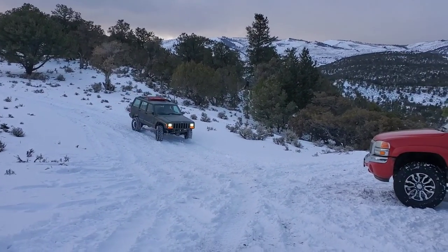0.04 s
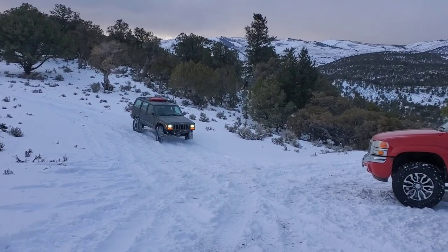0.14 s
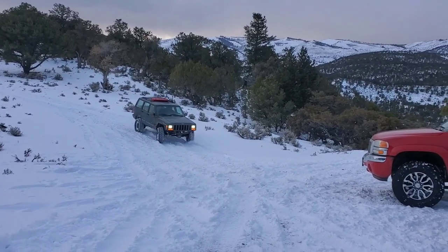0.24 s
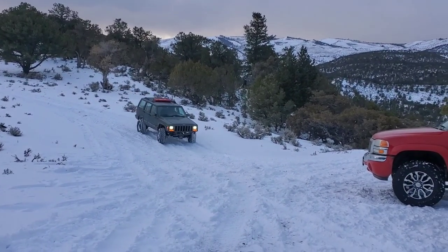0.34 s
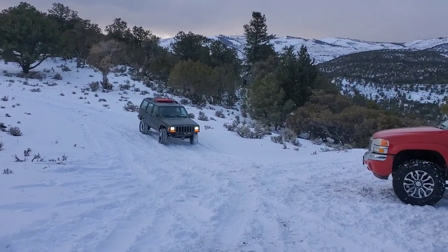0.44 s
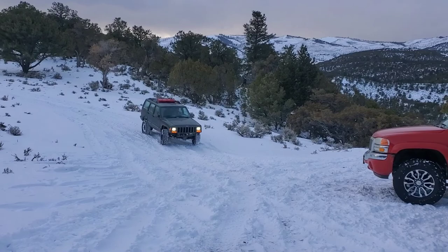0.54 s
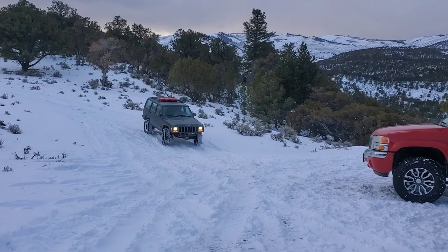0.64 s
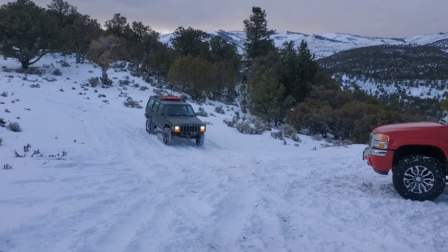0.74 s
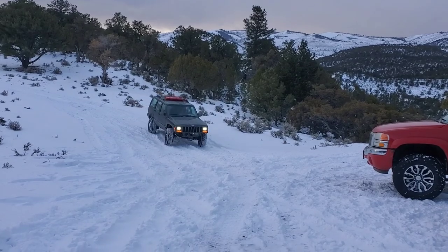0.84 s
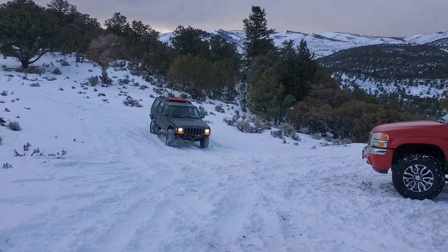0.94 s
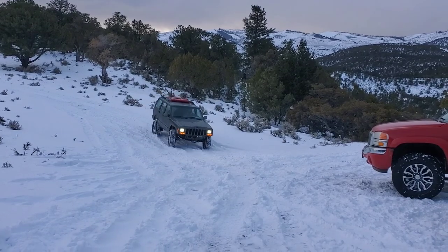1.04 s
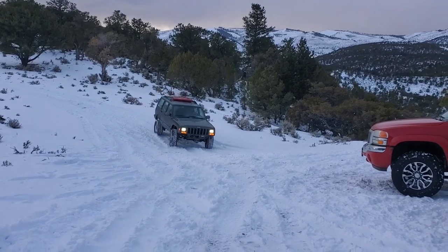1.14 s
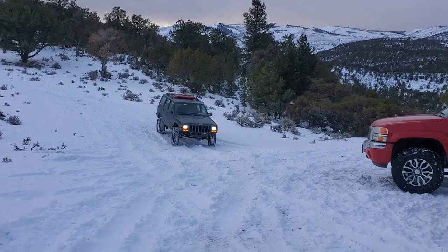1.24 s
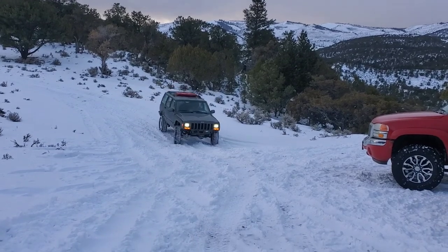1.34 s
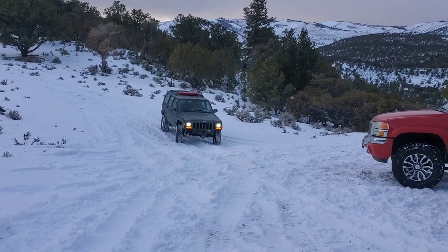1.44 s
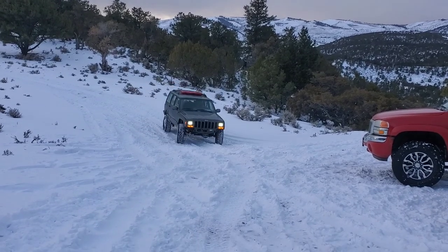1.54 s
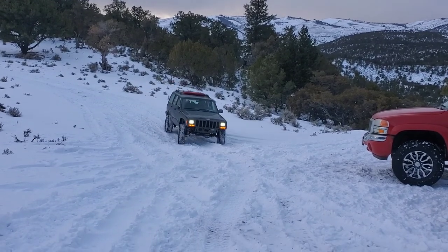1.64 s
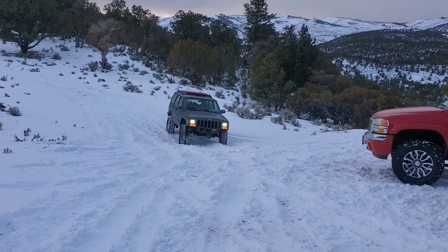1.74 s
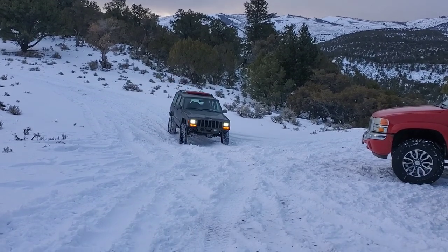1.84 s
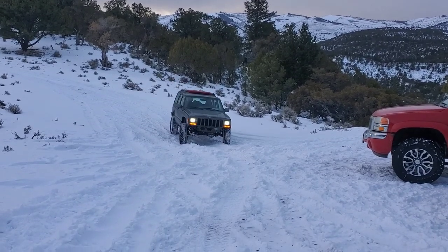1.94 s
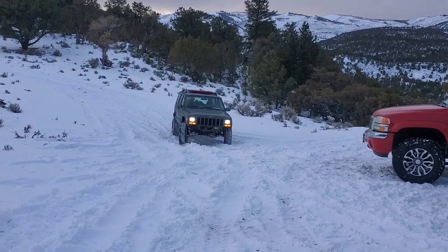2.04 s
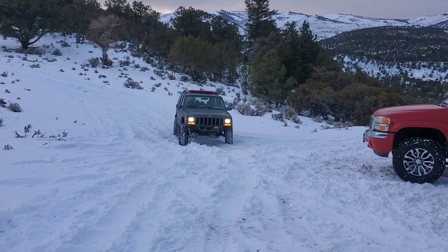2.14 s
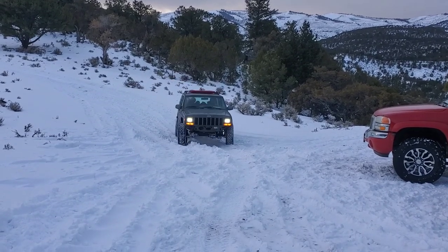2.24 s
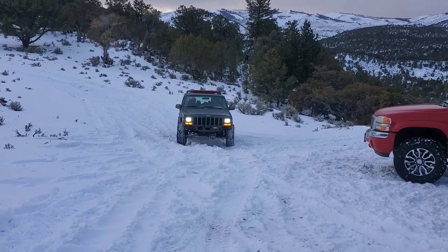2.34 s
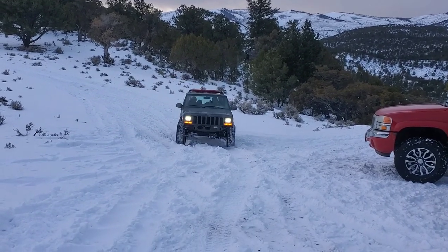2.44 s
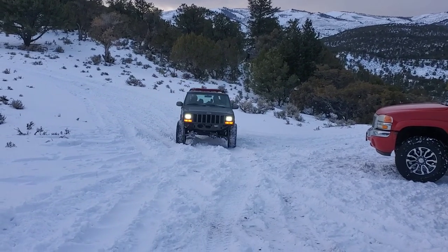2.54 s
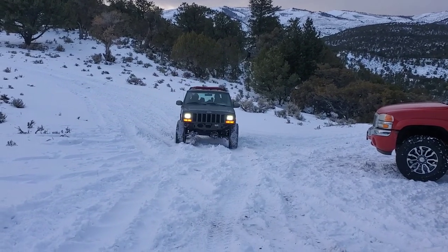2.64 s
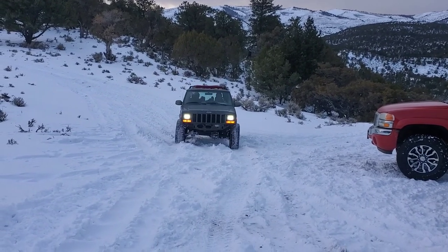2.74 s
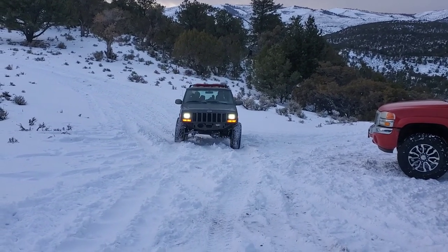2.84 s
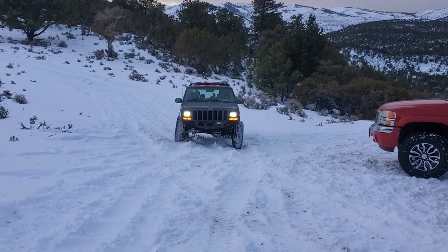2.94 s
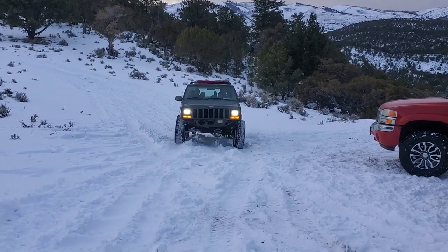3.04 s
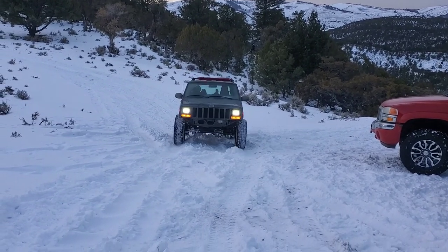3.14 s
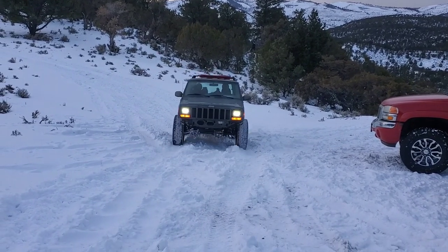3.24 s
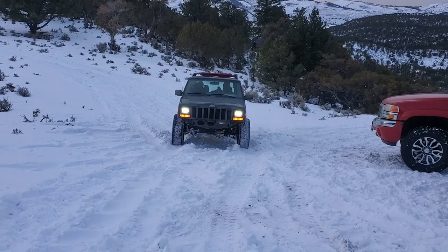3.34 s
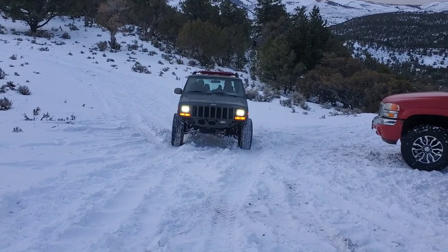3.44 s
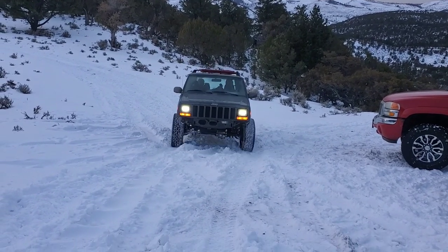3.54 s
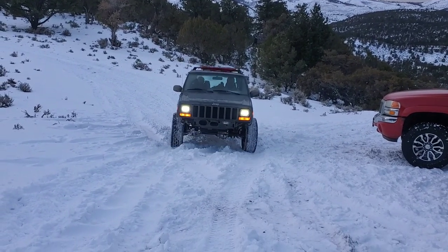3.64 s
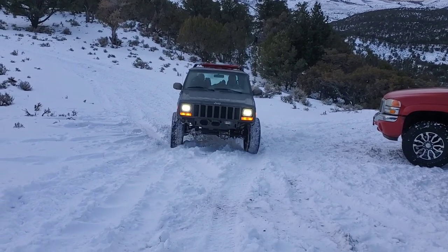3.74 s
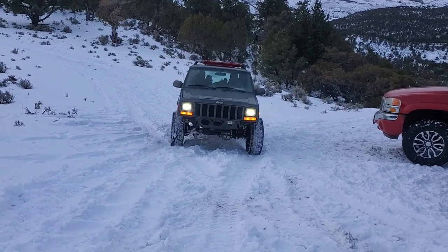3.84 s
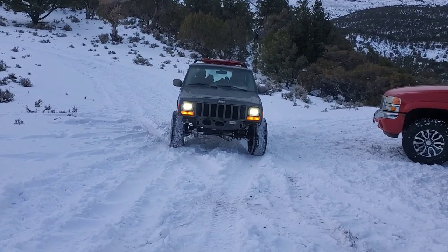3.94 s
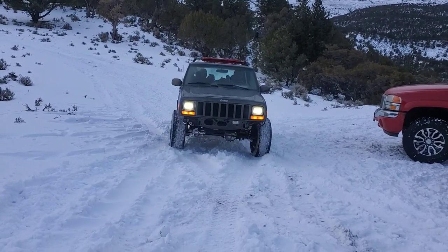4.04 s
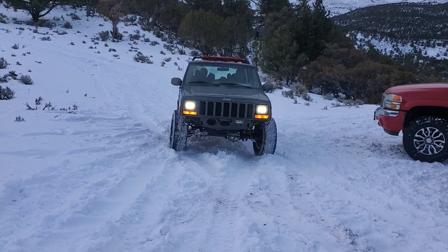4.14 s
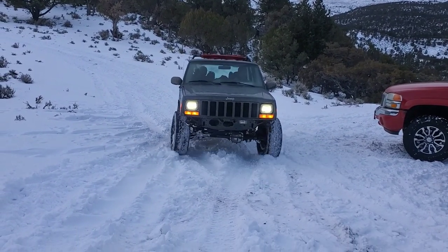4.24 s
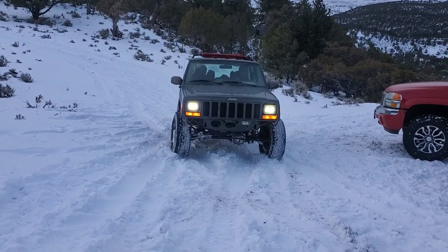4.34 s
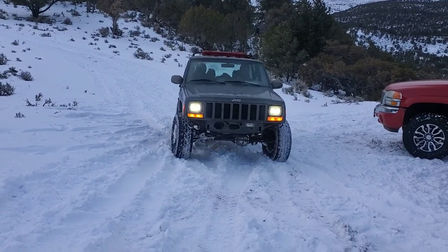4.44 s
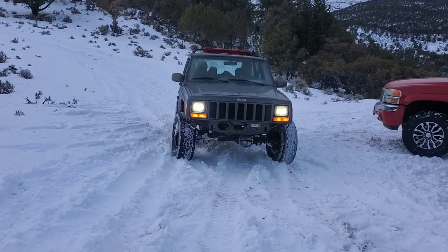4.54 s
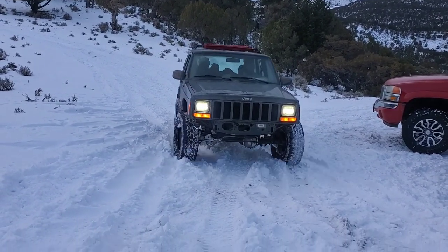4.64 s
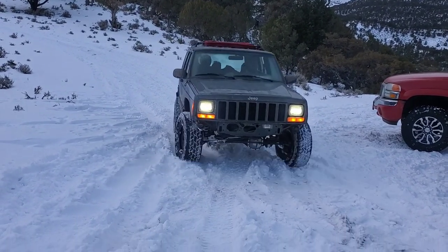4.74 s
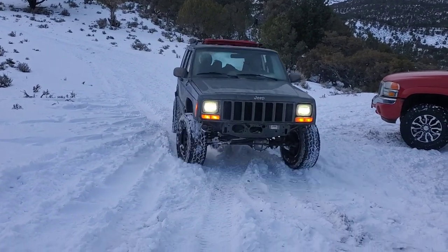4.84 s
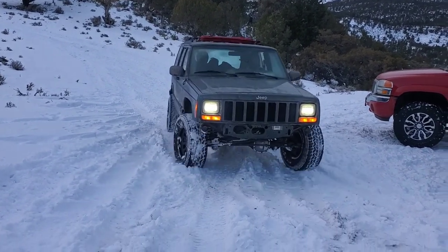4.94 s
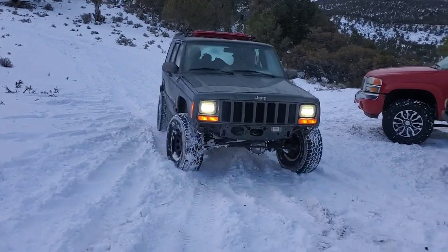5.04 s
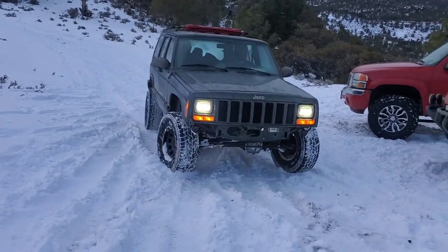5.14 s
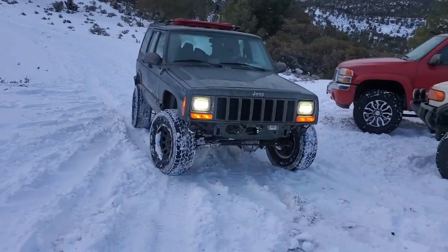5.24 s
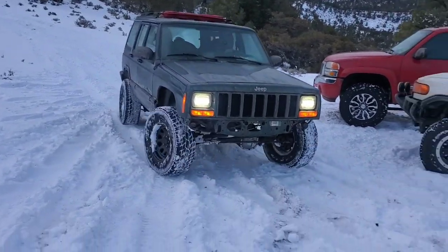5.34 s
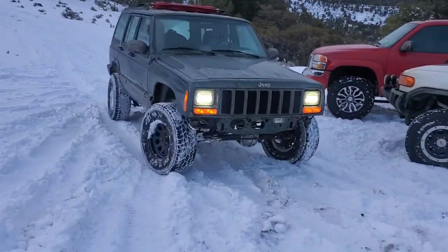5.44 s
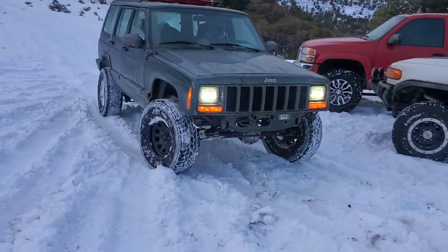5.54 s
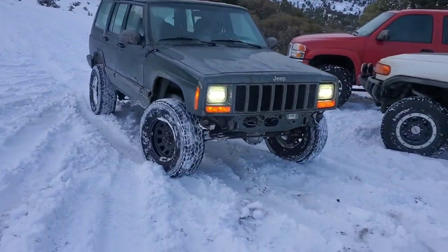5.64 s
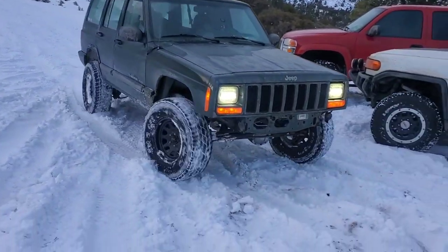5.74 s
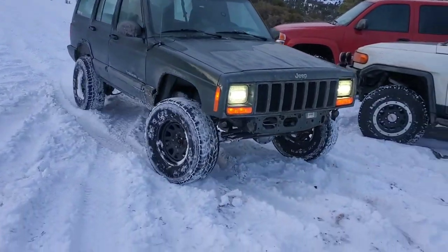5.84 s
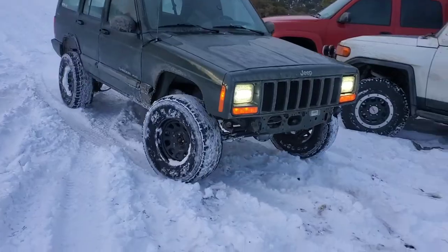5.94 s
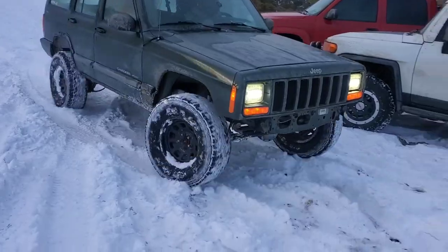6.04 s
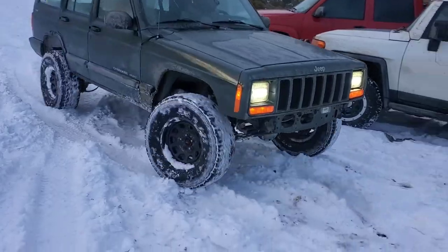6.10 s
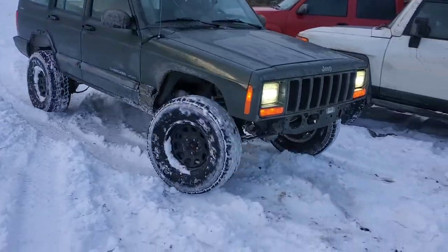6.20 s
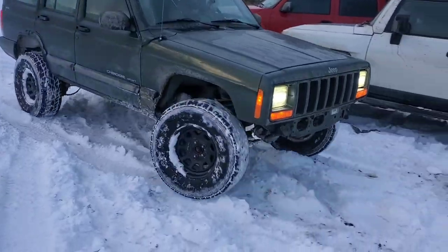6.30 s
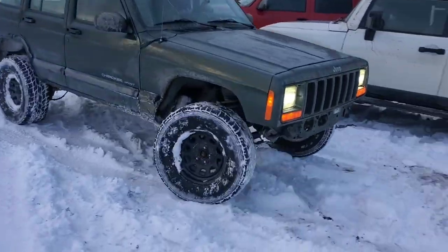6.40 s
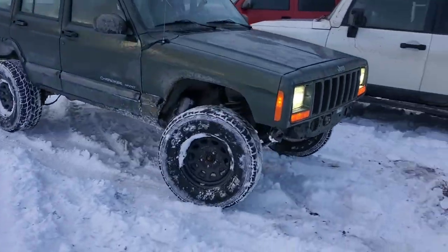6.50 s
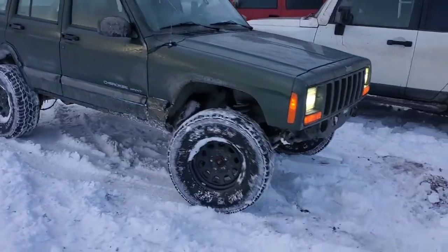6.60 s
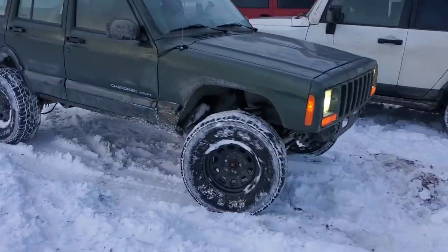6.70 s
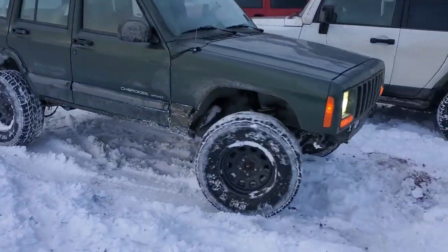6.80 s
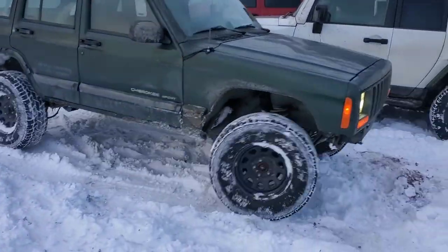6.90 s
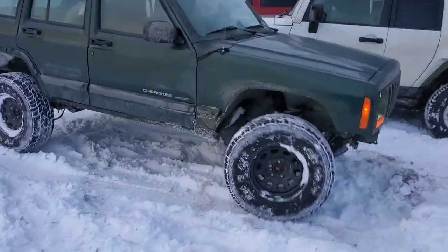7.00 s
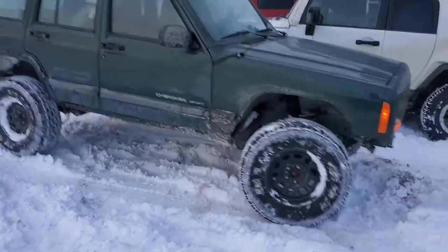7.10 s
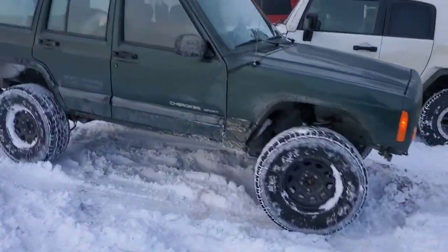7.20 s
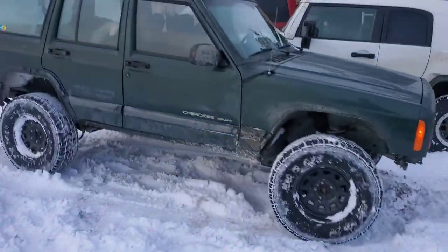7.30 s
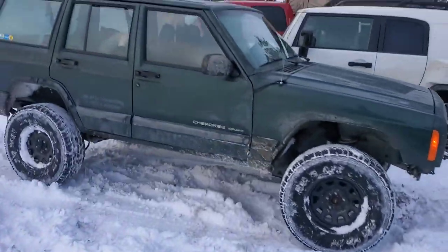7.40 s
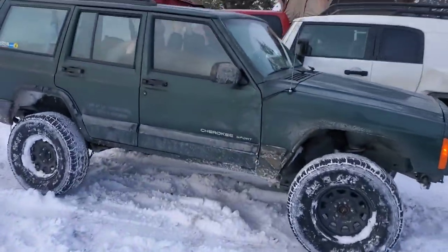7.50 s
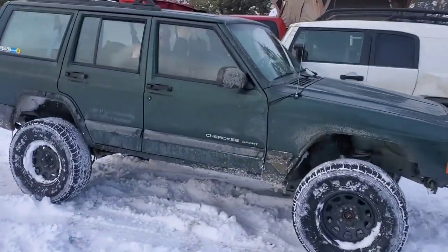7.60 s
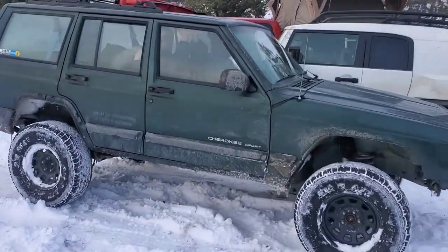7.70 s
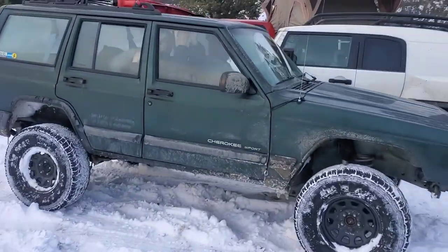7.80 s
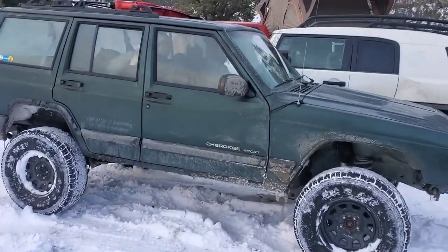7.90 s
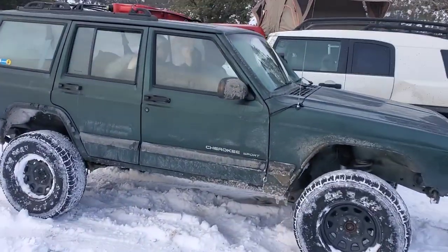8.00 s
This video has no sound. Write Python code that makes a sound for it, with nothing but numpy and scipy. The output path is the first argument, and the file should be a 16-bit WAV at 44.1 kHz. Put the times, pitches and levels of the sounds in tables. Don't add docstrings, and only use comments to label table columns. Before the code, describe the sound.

Low exhaust pulses, fan roar and belt whine approach across crackling snow, dropping to a lumpy idle amid buffeting gusts.

```python
import sys
import numpy as np
from scipy import signal
from scipy.io import wavfile
from scipy.ndimage import uniform_filter1d

SR = 44100
rng = np.random.default_rng(int(sys.argv[2]) if len(sys.argv) > 2 else 0)


def transcribe(signal):
    frames = np.atleast_2d(signal).T
    limited = np.clip(frames, -1, 1)
    pcm = np.round(limited * 32767).astype(np.int16)
    wavfile.write(sys.argv[1], SR, pcm)


def level_to_linear(level):
    exponent = np.asarray(level, float) / 20
    return 10 ** exponent


N = 355446
T = np.arange(N) / SR
CRUISE_HZ = 64


def evened(x):
    return x / np.sqrt(np.mean(x ** 2) + 1e-20)


def read(points, hz):
    f, value = np.transpose(points)
    return np.interp(np.log(hz + 1), np.log(f + 1), value)


def columns(rows):
    s, *rest = np.transpose(rows)
    return [np.interp(T, s, c) for c in rest]


def dips(rows):
    return sum(db * np.exp(-((T - s) / length) ** 2) for s, length, db in rows)


def drift(fastest_hz):
    steps = rng.standard_normal(N // 64 + 2)
    low_pass = signal.butter(2, fastest_hz, fs=SR / 64, output="sos")
    smooth = signal.sosfiltfilt(low_pass, steps)
    return np.interp(np.arange(N) / 64, np.arange(len(steps)), evened(smooth))


def band(x, lo_hz, hi_hz, order=3):
    return signal.sosfiltfilt(signal.butter(order, [lo_hz, hi_hz], "band", fs=SR, output="sos"), x)


def tone(turns, db):
    return np.sqrt(2) * level_to_linear(db) * np.cos(2 * np.pi * turns)


def paths(hz, s):
    # left_ms, right_ms, gain, lengthening_ms_per_s
    echoes = [
        (0, 0.082, 1, 0.0025),
        (1.78, 1.958, .33, .05),
        (.74, .62, 0.2, 0.033),
        (3.5, 3.5, .25, .09),
        (5.5, 5.5, 0.15, 0.17),
        (8.5, 9.1, 0.11, -.15),
    ]
    left_ms, right_ms, gain, slide = np.transpose(echoes)
    sway = .6 * np.sin(np.outer(s, .7 + .4 * np.arange(len(gain))))
    wander_ms = slide * (s[:, None] - 4 + sway)
    ports = np.array([np.exp(-2e-3j * np.pi * hz[:, None, None] * (ms + wander_ms)) @ gain
                      for ms in (left_ms, right_ms)])
    return ports / np.sqrt(np.mean(abs(ports) ** 2, axis=(0, 2), keepdims=True))


def noise(colour_points, lo_hz, hi_hz, patchy_db, flicker_db, alike=1, size=1024):
    # pitch_hz, likeness (0 to 1)
    likeness = [(60, .98), (600, .97), (1400, 0.89), (2000, 0.54), (3000, 0.65), (6500, 0.5), (15000, .4)]
    # pitch_hz, left_over_right_db
    port_lean = [(60, -2.5), (240, 5), (950, -1), (3770, 1), (15000, 3.5)]
    # pitch_hz, phase_radians
    right_lag = [(700, -0.3), (950, .5), (1120, -0.025), (1460, 1.25), (1850, 0.79), (2150, -1.6),
                 (3400, -1.3), (4400, .05)]
    frames, hz = N * 4 // size + 5, np.fft.rfftfreq(size, 1 / SR)
    a, b, c, d, patches = rng.standard_normal((frames, len(hz), 5)).T
    patches = uniform_filter1d(patches, size=6, axis=0)
    patches = evened(uniform_filter1d(patches, size=10, axis=1))
    flicker = evened(uniform_filter1d(rng.standard_normal(frames), size=4))
    same = np.clip(alike * read(likeness, hz), -1, 1)[:, None]
    left = a + 1j * b
    right = same * left + np.sqrt(1 - same ** 2) * (c + 1j * d)
    lean = level_to_linear(read(port_lean, hz) / 2)[:, None]
    colour = level_to_linear(read(colour_points, hz))
    unevenness = level_to_linear(patchy_db * patches + flicker_db * flicker)
    z = np.array([left * lean, right / lean]) * colour[:, None] * unevenness
    if alike == 1:
        z[1] *= np.exp(-1j * read(right_lag, hz))[:, None]
        z *= paths(hz, np.arange(frames) * size / 4 / SR)
    inside = np.sum(colour[(hz > lo_hz) & (hz < hi_hz)] ** 2) / np.sum(colour ** 2)
    sound = signal.istft(z, nperseg=size, noverlap=size * 3 // 4)[1][:, :N]
    return evened(sound) / np.sqrt(inside)


def speed():
    # start_s, firings_per_s
    driven = [(0.02, 68.4), (0.2, 70.7), (0.62, 63.3), (0.95, 71.5), (1.2, 74.1), (1.8, 77.9), (2.15, 85.3),
              (2.6, 84.3), (2.85, 77.2), (3.05, 82.5), (3.3, 75), (3.75, 66.5), (3.92, 67), (4.18, 59.3),
              (4.65, 64.9), (5.25, 63.8), (5.42, 67), (5.65, 66)]
    lift_s, lift_hz = driven[-1]
    stall_hz, coast_s = 30, .4
    coast = stall_hz + (lift_hz - stall_hz) * np.exp(-(T - lift_s) / coast_s)
    idle = 36.6 + 1.3 * np.sin(2 * np.pi * (T - 6.55) / 1.7)
    hz = np.where(T < lift_s, columns(driven)[0], np.maximum(coast, idle))
    return uniform_filter1d(hz, size=4000)


def far_db():
    # start_s, distance_m
    distance = [
        (0, 23.4),
        (.25, 10.5),
        (1, 10.6),
        (2.5, 6.35),
        (3.7, 4.12),
        (5.4, 3.98),
        (8.06, 7.1),
    ]
    return 20 * np.log10(columns(distance)[0] / 4)


def bustle():
    fan_db_per_tenfold = 32.6
    return fan_db_per_tenfold * np.log10(speed() / CRUISE_HZ) - far_db()


def wind():
    # start_s, level_db, left_over_right_db
    breeze = [(0.03, -55, -4), (0.7, -44, -0.5), (1.09, -44.5, -4), (3.09, -53, -4), (3.6, -45, 0.5),
              (4.7, -45, -3.5), (5.47, -37.5, 4), (5.72, -45, 4), (5.9, -39, 4), (6.31, -44, 2.5),
              (6.6, -37, 2.5), (6.73, -52, -5), (6.86, -43.5, 6), (7.3, -34.5, 5.5), (7.71, -40, 13.5),
              (7.93, -33.5, -2), (8.0, -48, -6)]
    # pitch_hz, level_db (per Hz)
    breeze_colour = [(12, -54.5), (20, -22.5), (45, -2), (86, 2.5), (189, -12), (226, -14.5), (520, -30),
                     (612, -50), (700, -33.5), (910, -43), (1540, -120)]
    # centre_s, level_db, length_s, port (0 left, 1 right)
    gust_blows = [(5.567, -30, 0.02, 0), (6.372, -26, 0.021, 0), (6.483, -27.5, 0.024, 0),
                  (6.519, -29, 0.018, 0), (6.543, -33, 0.022, 1), (6.56, -35, 0.034, 0),
                  (6.617, -38, 0.025, 0), (6.618, -25, 0.011, 1), (6.85, -23.5, 0.027, 0),
                  (7.004, -28, 0.025, 1), (7.007, -34, 0.031, 0), (7.126, -23.5, 0.025, 0),
                  (7.237, -28, 0.012, 0), (7.273, -26, 0.077, 0), (7.348, -31, 0.024, 0),
                  (7.398, -40, 0.013, 0), (7.475, -30, 0.103, 0), (7.507, -32, 0.026, 0),
                  (7.76, -39, 0.13, 0), (7.805, -43, 0.018, 0), (7.854, -24.5, 0.037, 0),
                  (7.944, -35, 0.016, 0)]
    db, pan_db = columns(breeze)
    port_db = db - 3.5 + np.outer([.5, -.5], pan_db)
    lumps = level_to_linear(3.86 * np.array([drift(54), drift(32)]))
    air = lumps * noise(breeze_colour, 230, 420, 2.4, 0.99, alike=0.17, size=2048)
    rumble = band(air, 10, 130, order=2)
    out = level_to_linear(port_db) * (air - rumble) + level_to_linear(-48 + .5 * (port_db + 47.5)) * rumble
    blows = np.zeros((2, N))
    for s, db, length, port in gust_blows:
        spread = length * np.where(T < s, .3, .55)
        blows[round(port)] += level_to_linear(db - 10.5) * np.exp(-((T - s) / spread) ** 2)
    gust = band(rng.standard_normal((2, N)), 210, 2500)
    gust = signal.sosfilt(signal.butter(2, 500, fs=SR, output="sos"), gust)
    return out + blows * evened(gust)


def flicks():
    # start_s, tick_db, thump_db, pan_db (half of left_over_right_db)
    edge_flicks = [(6.615, -34, -44, 2), (6.843, -32, -33, 17), (7.001, -34, -21.5, -6),
                   (7.044, -27, -57.5, -17), (7.06, -49, -53, -1.5), (7.134, -36, -40, 3),
                   (7.267, -38, -33, 10), (7.303, -42, -32, 10), (7.464, -47, -28, 10.5),
                   (7.593, -42, -40, 10), (7.714, -40, -39, 5), (7.755, -43, -33.5, 6),
                   (7.847, -43, -45, 7), (7.858, -44, -46, 6), (7.87, -44, -47, 5), (7.93, -57, -32, 1.5)]
    out, t = np.zeros((2, N)), np.arange(1500) / SR
    for s, tick_db, thump_db, pan_db in edge_flicks:
        burst = (1.5 + rng.standard_normal(len(t))) * np.exp(-t / .0005)
        tick = signal.lfilter([1], [1, -.88], burst) / 3.5
        ring = np.sin(2 * np.pi * 430 * t) * (1 - np.exp(-t / 0.00071)) * np.exp(-t / 0.004)
        sound = level_to_linear(tick_db) * tick + level_to_linear(thump_db + 8.5) * ring
        sides = level_to_linear([[pan_db], [-pan_db]]) / np.cosh(pan_db / 5.9)
        out[:, round(s * SR):][:, :len(t)] += sides * sound
    return out


def crunch():
    # start_s, length_s, level_db (over the bed)
    breaks = [(0.305, 0.21, 4.5), (0.6, .11, 7.5), (0.802, 0.24, 8), (1.055, 0.024, 6), (5.024, .08, 1.5),
              (5.73, 0.047, 1), (6.1, 0.15, 2.5), (6.31, 0.13, 4), (6.78, 0.12, 4), (6.98, 0.08, 6),
              (7.1, .08, 8), (7.325, .05, 5), (7.475, 0.046, 4)]
    rise_s, fall_s = 0.012, 0.06
    swells = []
    for s, length, db in breaks:
        shape = np.minimum((T - s) / rise_s, 1 + (s + length - T) / fall_s)
        swells.append(db * np.clip(shape, 0, 1))
    bed_db = -62.5 + 0.26 * bustle() - 0.24 * far_db()
    return bed_db + np.max(swells, axis=0)


def snow():
    # pitch_hz, level_db (per Hz)
    fizz_colour = [(1470, -32.5), (2500, 2.5), (2960, -10), (4260, -4.5), (6370, -6), (7910, -11.5),
                   (11900, -5.5), (15100, -5.5), (15900, -8.5)]
    snaps = (rng.random(N) < 60 / SR) * np.minimum(rng.exponential(40., N), 90)
    grains = 1 + .3 * uniform_filter1d(snaps, size=60)
    fizz = noise(fizz_colour, 9900, 16900, patchy_db=2.0, flicker_db=0.4, alike=0.16, size=256)
    return level_to_linear(crunch() + 2.0) * grains * fizz


def brake():
    # start_s, length_s, pitch_hz, rise_hz_per_s, level_db
    squeak = (7.3, .1, 4260, 1000, -67)
    s, length, hz, rise, db = squeak
    shape = np.exp(-((T - s - length / 2) / (length / 2)) ** 4)
    glide_hz = hz + rise * np.clip(T - s, 0, length)
    return shape * tone(np.cumsum(glide_hz * (1 + .025 * drift(200))) / SR, db + 4 * drift(40))


def engine_bay(firings):
    # pitch_hz, level_db (per Hz)
    roar_colour = [(190, -28), (330, -7), (350, -16.5), (364, -10), (527, 2.5), (602, 2), (919, -4.5),
                   (1170, -3), (1300, -4), (1550, -15.5), (1600, -16), (2080, -45.5), (3520, -120)]
    # pitch_hz, level_db (per Hz)
    clatter_colour = [(880, -29.5), (1500, -2), (1560, -7), (1740, 2), (1940, -6), (2170, -3), (2390, -7),
                      (2590, -4), (2810, -5.5), (3700, -7), (3930, -8), (4170, -9), (4530, -10.5),
                      (7500, -28), (9750, -58.5), (16500, -120)]
    roar_db = -43.5 + bustle()
    clatter_db = -55.5 + .7 * bustle()
    clatter_db = np.minimum(clatter_db, roar_db - 7.5)
    puffs = evened(1 + 0.069 * np.cos(2 * np.pi * firings))
    roar = level_to_linear(roar_db + 0.5) * noise(roar_colour, 500, 1500, patchy_db=1.0, flicker_db=-0.7, size=2048)
    roar = roar + band(roar, 950, 2400) * (level_to_linear(0.6 * far_db() - 2.0) - 1)
    clatter = noise(clatter_colour, 1900, 3900, patchy_db=3.0, flicker_db=0.26, size=2048)
    return roar + level_to_linear(clatter_db + 2.0) * puffs * clatter


def whine(cruise_hz, hz_slope, cruise_db, db_slope, end_s):
    faster = speed() - CRUISE_HZ
    hz = cruise_hz + hz_slope * faster
    db = cruise_db + db_slope * faster - 1.26 * T
    fade = np.clip((end_s - T) / .15, 0, 1)
    return fade * tone(np.cumsum(hz * (1 + 0.0023 * drift(7.9))) / SR, db + 0.46 * drift(12))


def belt_whines():
    # pitch_hz, hz_per_hz, level_db, db_per_hz, end_s
    belts = [
        (253, .97, -52, .15, 3.9),
        (315, 2.07, -50, -.4, 5.4),
    ]
    return sum(whine(*row) for row in belts)


def beat_levels(hz):
    # start_s, level_db
    effort = [(0, -31.5), (.28, -23), (.65, -24), (.9, -21.5), (1.6, -20), (1.95, -15.5), (2.95, -15.5),
              (3.5, -17), (4.0, -16.5), (4.6, -15), (5.35, -13.5), (5.68, -15), (5.79, -21), (5.87, -29.5),
              (6.5, -32), (7.1, -25.5), (7.7, -24.5), (8.06, -26)]
    # pitch_hz, level_db
    muffler = [(36, -17), (52, -17), (62, -3), (74, 0), (110, -9.5), (130, -9), (168, -22), (250, -36.5)]
    # centre_s, length_s, level_db
    stumbles = [
        (.68, 0.066, -3),
        (2.97, .08, 3),
        (4.033, 0.071, -8),
        (5.74, 0.091, -12),
    ]
    # centre_s, length_s, level_db
    misses = [
        (5.97, 0.032, -5.5),
        (6.14, 0.016, -7),
        (7.35, .06, -3),
        (6.3, .025, -7),
        (7.9, 0.013, 0),
    ]
    effort_db = columns(effort)[0] + dips(misses)
    sag_db = dips(stumbles)
    sharpness_db = (sag_db, 5.5, 6.5 - 0.6 * sag_db)
    levels_db = []
    for k, db in zip((1, 2, 3), sharpness_db):
        ring_db = 5 * np.exp(-((k * hz - 185.4) / 12) ** 2)
        levels_db.append(effort_db + db + read(muffler, k * hz) + ring_db)
    return levels_db


def exhaust():
    # crank_multiple, level_db (against the strongest beat), extra_idle_db
    crank_lines = [(2, -27, 0), (4, -21.5, 10), (5, -15, 0.5), (7, -27.5, 10.5), (8, -19, 7),
                   (10, -26.5, -4), (11, -17.5, -1), (12, -4.5, 0.5), (13, -29.5, 6.5), (14, -23.5, 10),
                   (15, -7, -0.5), (16, -26.5, 5.5)]
    # pitch_hz, level_db
    tailpipe = [(40, -12), (80, -2), (150, -10), (188, 2.5), (225, -12), (260, -29.5), (330, -40.5),
                (450, -51.5)]
    # pitch_hz, level_db (per Hz)
    rasp_colour = [(20, -37), (45, -9), (70, 6), (120, -2.5), (190, 2), (240, -19.5), (320, -43),
                   (600, -93.5)]
    hz = speed()
    levels_db = beat_levels(hz)
    firings = np.cumsum(hz * (1 + 0.0045 * drift(8.3))) / SR
    beats = 0
    for k, lag, db in zip((1, 2, 3), (0., .02, .1), levels_db):
        beats += tone(k * firings - lag, db + 0.26 * drift(34))
    strongest_db = np.max(levels_db, axis=0)
    idling = np.clip((50 - hz) / 12, 0, 1)
    lines = 0
    for k, db, idle_db in crank_lines:
        level_db = strongest_db + db + idle_db * idling + read(tailpipe, k * hz / 3)
        lines += tone(k * firings / 3 + rng.random(), level_db + 1.08 * drift(5.7))
    rasp = noise(rasp_colour, 40, 240, 1.0, 0.3, alike=0.94, size=2048)
    rasp = level_to_linear(strongest_db - 23 + 11.0 * idling) * rasp
    return beats + lines + rasp, firings


def scene():
    beats, firings = exhaust()
    car = beats + belt_whines() + brake()
    unsteady = level_to_linear(0.36 * drift(10))
    return car + unsteady * (engine_bay(firings) + snow()) + wind() + flicks()


def wind_guard(sound):
    # start_s, length_s, depth_db (before the 3.4-fold deepening), port (0 left, 1 right)
    bass_mutes = [(5.85, 0.022, -5, 0), (5.91, 0.091, -5.5, 0), (5.985, 0.0098, -10, 0),
                  (6.028, 0.022, -5.5, 0), (6.12, 0.037, -0.5, 1), (6.351, 0.026, -30, 0),
                  (6.504, 0.041, -3, 1), (6.506, 0.046, -31, 0), (7.011, 0.025, -6, 1),
                  (7.264, 0.024, -7, 0), (7.302, 0.042, -34, 0), (7.31, 0.075, -3, 1),
                  (7.381, 0.046, -13, 0), (7.555, 0.023, -19, 0), (7.86, 0.051, -41, 0)]
    mute_db = np.zeros((2, N))
    for s, length, db, port in bass_mutes:
        mute_db[round(port)] += 3.4 * db * np.exp(-((T - s - length / 2) / (0.48 * length)) ** 4)
    return sound - band(sound, 10, 200, order=4) * (1 - level_to_linear(mute_db))


def band_limit(x):
    return signal.sosfilt(signal.butter(12, 16010, fs=SR, output="sos"), x)


def record(dry):
    low_pass = signal.firwin(1023, 15790, window=("kaiser", 9), fs=SR)
    limited = signal.oaconvolve(wind_guard(dry), low_pass[None], "same")
    return band_limit(limited)


dry = scene()
out = record(dry)
transcribe(out)
```